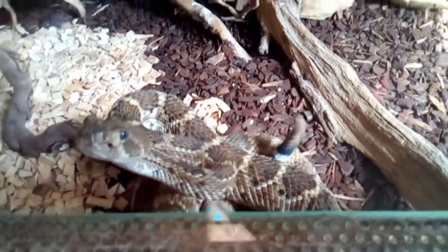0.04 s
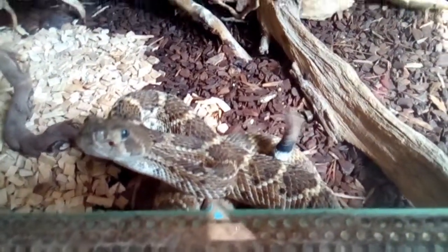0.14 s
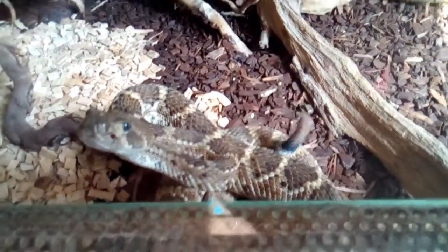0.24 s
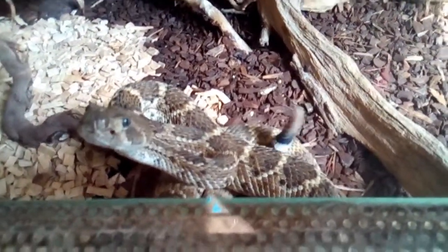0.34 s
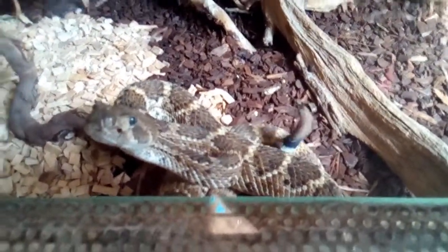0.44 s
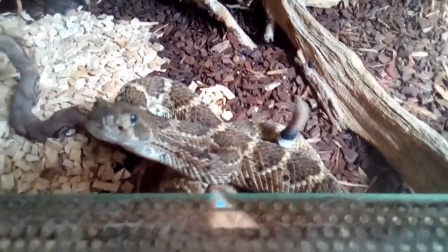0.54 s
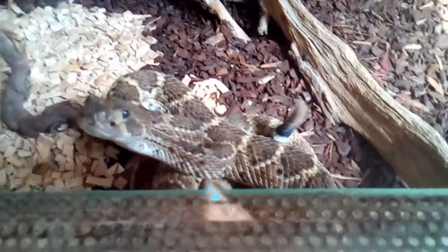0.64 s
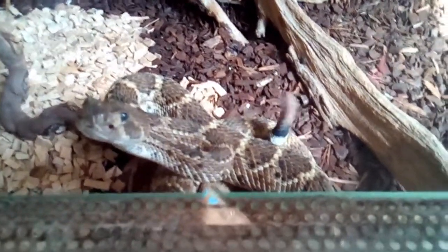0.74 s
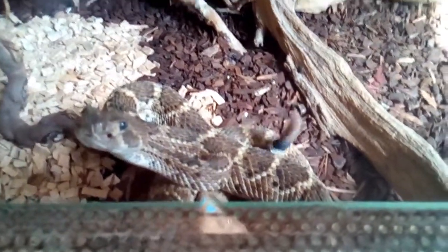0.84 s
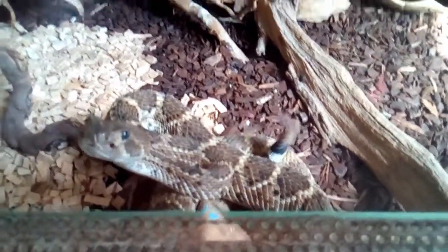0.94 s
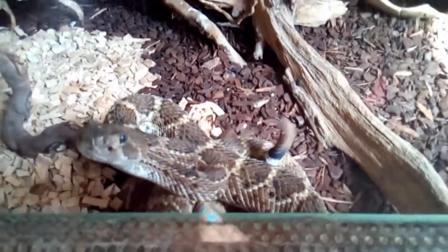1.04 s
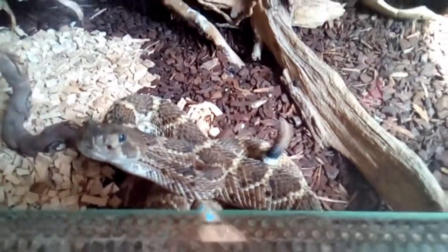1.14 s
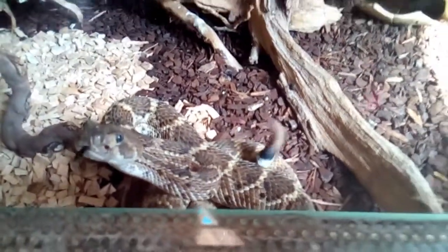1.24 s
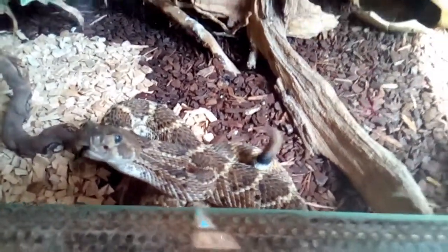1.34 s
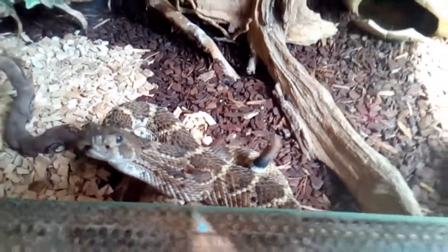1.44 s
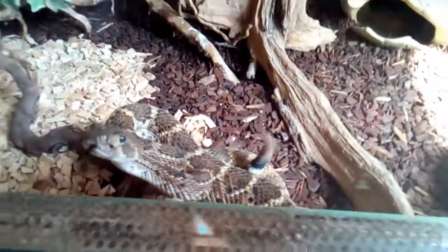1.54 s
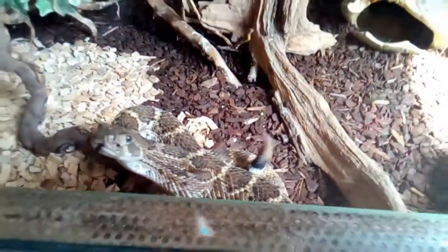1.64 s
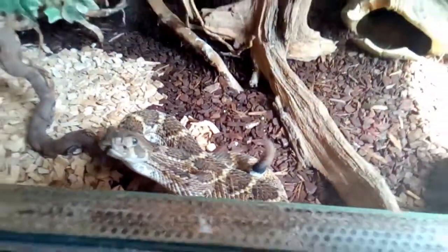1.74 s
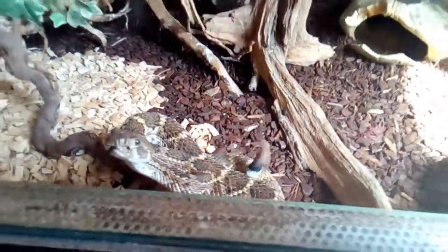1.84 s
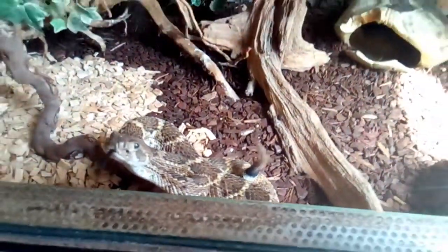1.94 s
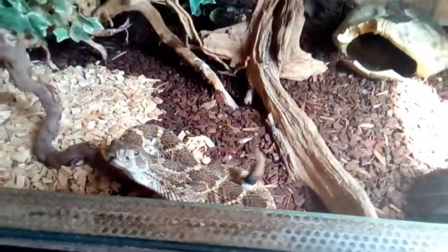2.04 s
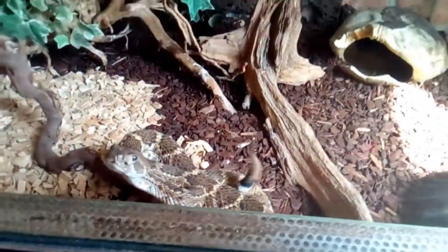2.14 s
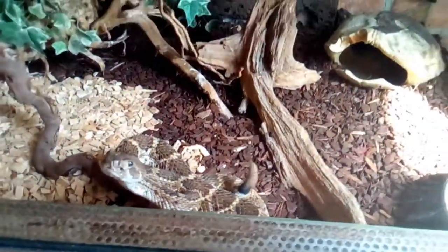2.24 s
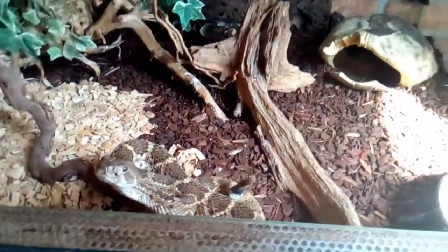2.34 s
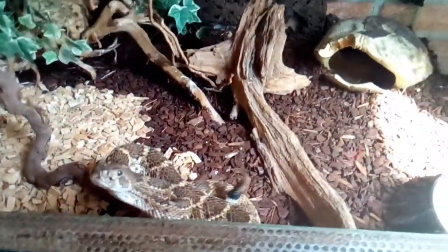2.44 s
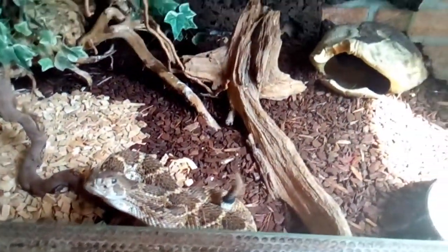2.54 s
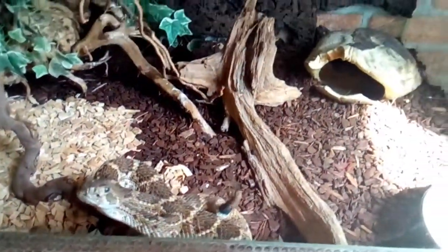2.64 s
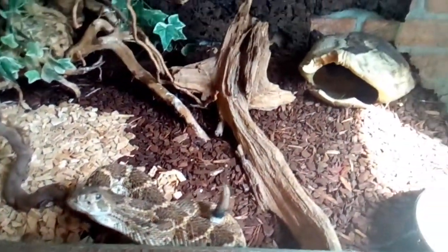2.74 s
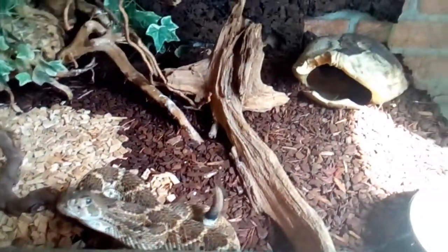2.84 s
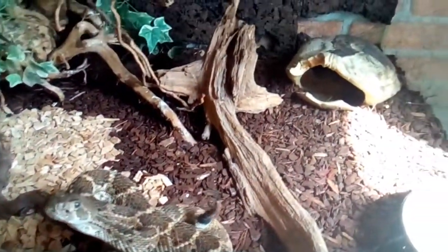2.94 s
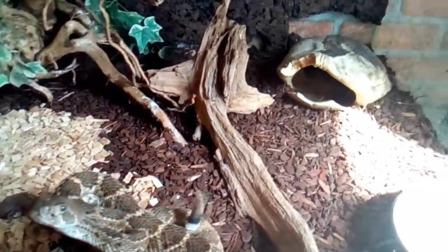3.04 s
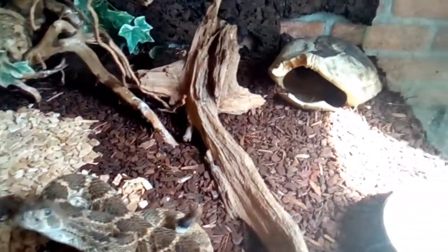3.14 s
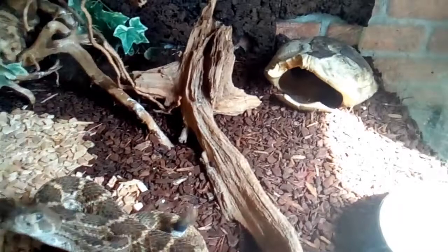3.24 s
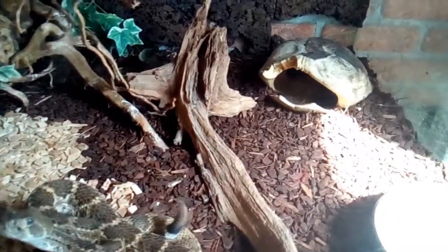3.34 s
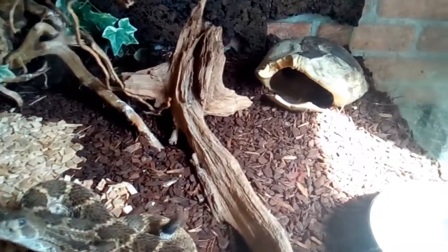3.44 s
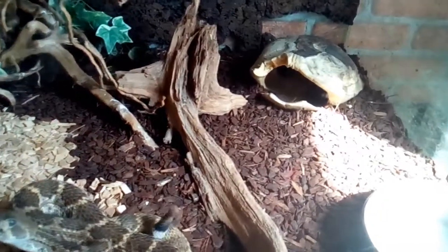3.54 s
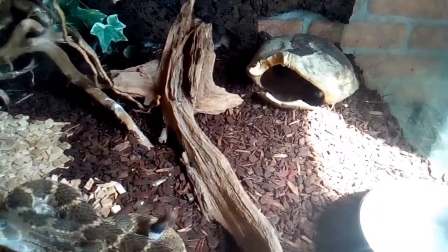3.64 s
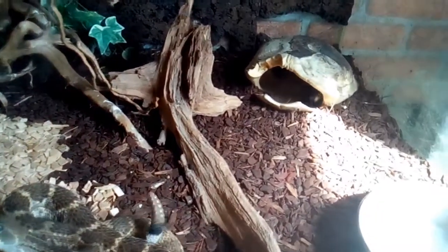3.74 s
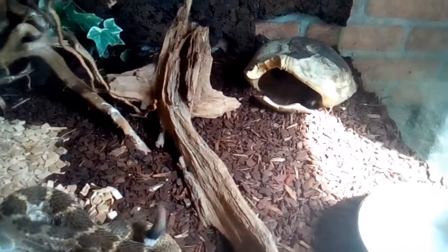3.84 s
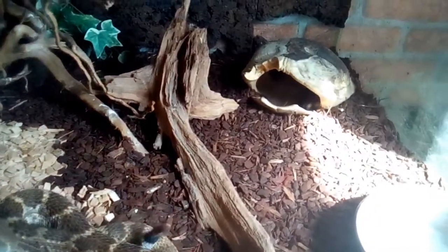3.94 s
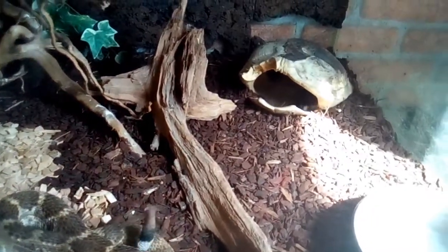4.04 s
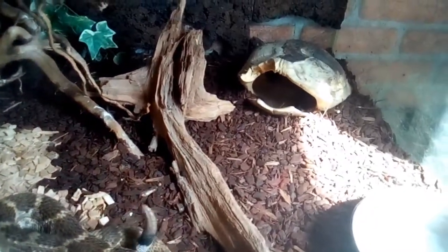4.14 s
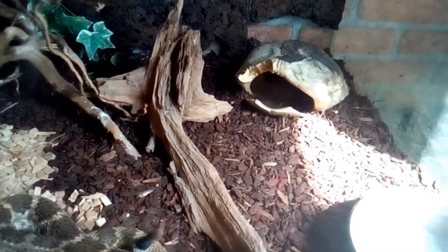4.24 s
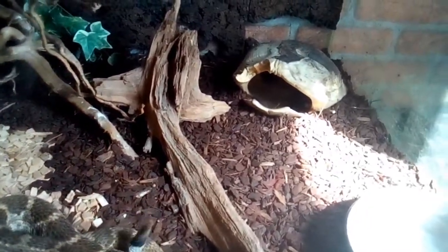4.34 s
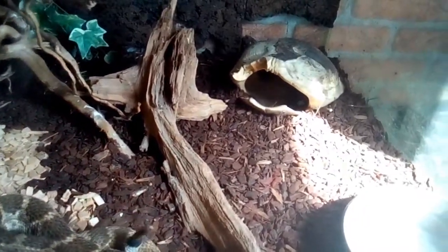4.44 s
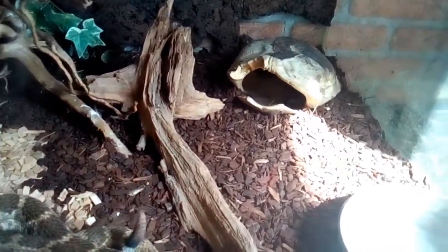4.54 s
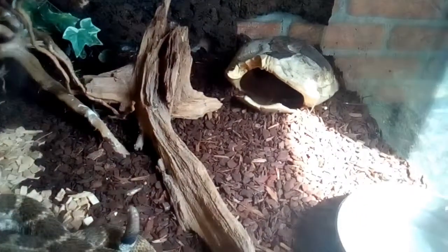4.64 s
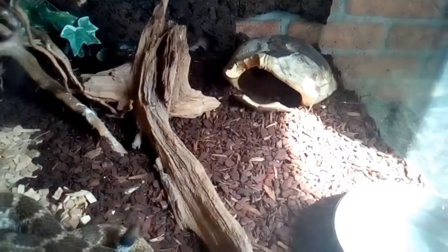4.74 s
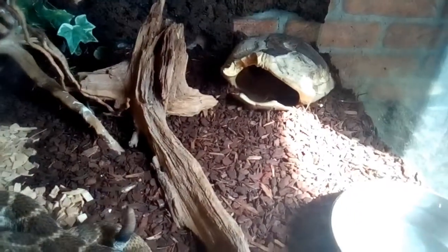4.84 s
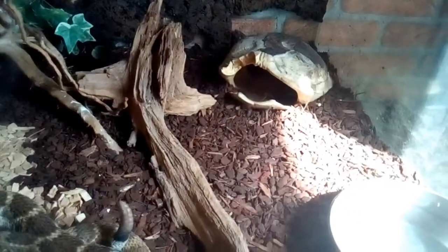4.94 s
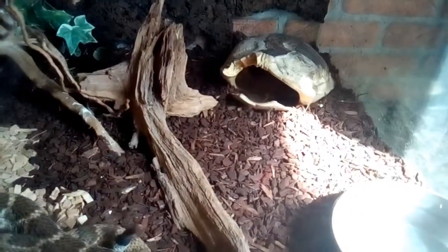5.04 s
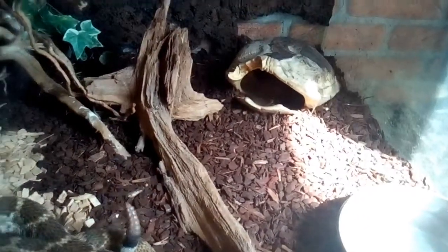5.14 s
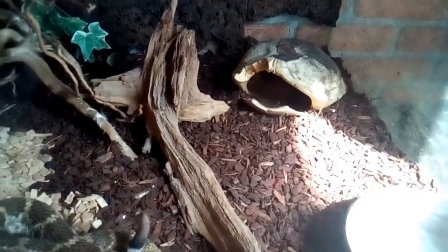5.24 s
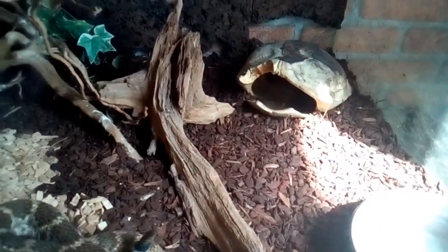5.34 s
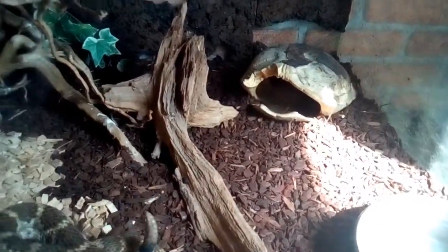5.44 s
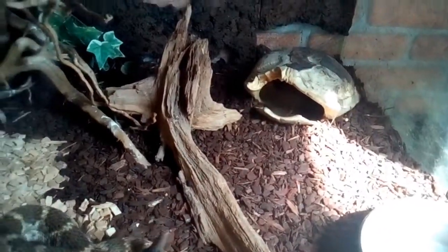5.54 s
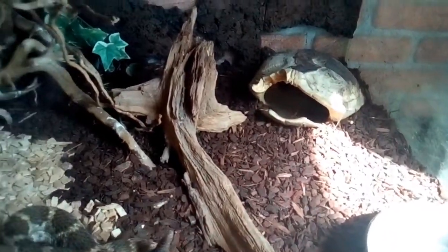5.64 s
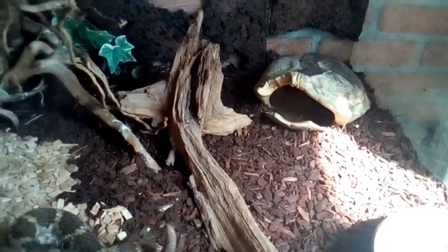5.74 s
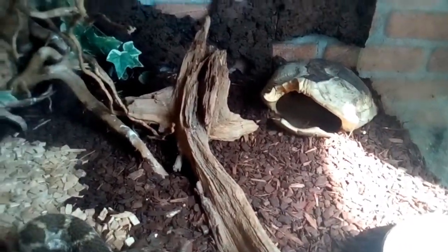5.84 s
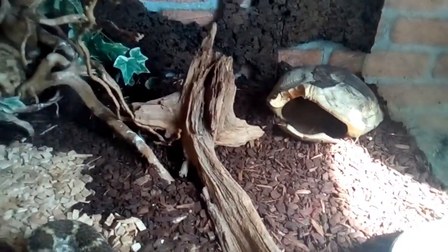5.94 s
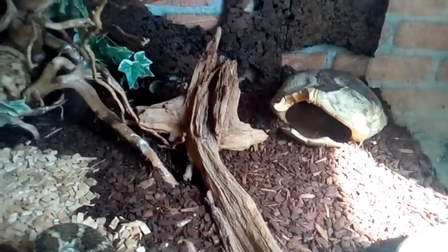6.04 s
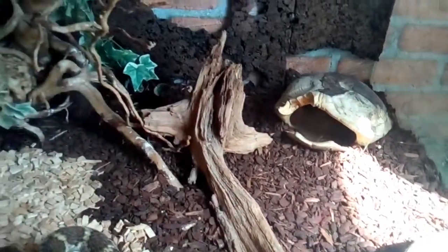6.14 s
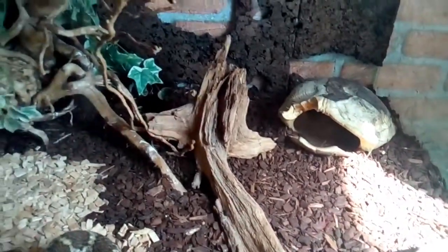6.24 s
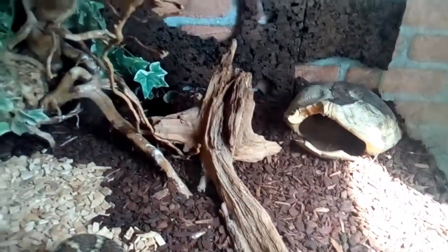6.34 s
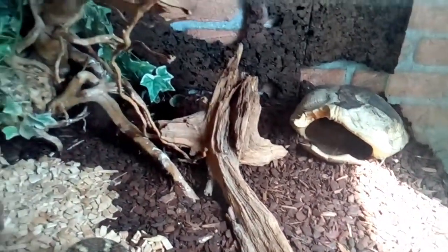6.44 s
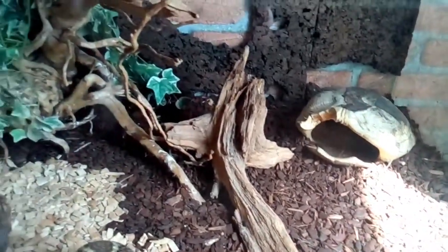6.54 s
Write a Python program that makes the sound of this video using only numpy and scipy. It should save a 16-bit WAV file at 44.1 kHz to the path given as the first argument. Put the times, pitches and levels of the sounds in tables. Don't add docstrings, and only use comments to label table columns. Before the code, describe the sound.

Dense dry rattling near a glass tank thins into rapid double clicks that gradually space out and weaken, with a few finger taps on the phone.

```python
import sys
import numpy as np
from scipy import signal
from scipy.fft import rfft, irfft, next_fast_len
from scipy.io import wavfile
from scipy.ndimage import map_coordinates

SR = 44100
rng = np.random.default_rng(int(sys.argv[2]) if len(sys.argv) > 2 else 0)


def linear_from_db(decibels):
    return 10 ** (np.asarray(decibels, float) / 20)


def wrap_up_sound(samples):
    columns = np.atleast_2d(samples).T
    tamed = np.clip(columns, -1, 1)
    steps = np.round(tamed * 32767).astype(np.int16)
    wavfile.write(sys.argv[1], SR, steps)


N = 291060
T = np.arange(N) / SR
TOP_HZ = 15525

# start_s, level_db
CHATTER = [
    (0.0, -28),
    (0.25, -30.5),
    (0.5, -29),
    (0.85, -30),
    (1.2, -30),
    (1.5, -30.5),
    (1.8, -31),
    (2.04, -33),
    (2.19, -32.5),
]
# centre_s, depth_db, half_length_s
LULLS = [
    (.281, -7, 0.0041),
    (.667, -6, .005),
    (.785, -0.5, 0.011),
    (.878, -4, .015),
    (1.07, -1.5, .018),
    (1.11, 1, 0.0035),
    (1.33, -1, .008),
    (2.187, -6, .006),
]
# from_s, to_s
CHATTER_FADE = (2.2, 2.65)
# start_s, level_db, return_after_s, return_rel_db (relative
SHAKES = [(2.2, -34, .012, -0.5), (2.243, -33.5, .022, -2), (2.295, -32, 0.025, -1.5),
          (2.346, -33, .015, 0), (2.387, -33, .014, -0.5), (2.444, -31.5, .025, .4),
          (2.505, -32.5, .016, -3), (2.546, -32.5, .022, -0.5), (2.62, -30.5, 0.021, -5),
          (2.673, -31, 0.026, -3.5), (2.738, -29, 0.025, -6.5), (2.794, -31, .019, -2),
          (2.84, -34.5, 0.016, -1), (2.899, -31.5, 0.024, -2.1), (2.943, -33, 0.019, -2),
          (2.995, -31.5, .017, -3), (3.049, -32, .016, -1), (3.105, -34.5, .014, 1.1),
          (3.157, -31, 0.013, -3.5), (3.213, -33, .018, -5), (3.258, -33, .02, 1.5),
          (3.323, -32, .017, -2), (3.383, -34, .022, -9), (3.426, -34, 0.013, 0.5),
          (3.489, -32, 0.021, -7), (3.536, -32, .014, -5.5), (3.588, -32.5, .014, -3.5),
          (3.647, -34.5, 0.018, -4.5), (3.697, -34, 0.013, 0),
          (3.758, -37.5, 0.017, -2), (3.806, -33, .022, -6.5), (3.876, -37.5, 0.018, -1),
               (3.929, -36, .013, 0), (3.997, -36, .024, -5), (4.053, -38, 0.011, 0.5),
               (4.123, -35.5, .024, -5.5), (4.189, -31.5, 0.021, -13), (4.244, -34, 0.024, -11),
               (4.301, -39.5, 0.013, 3.5), (4.383, -34.5, .014, -8), (4.438, -41.5, 0.02, 2),
               (4.491, -37, .013, 3), (4.57, -36, 0.018, -0.5), (4.652, -35, .021, -7.5),
               (4.738, -37.5, 0.022, -6), (4.826, -35.5, 0.017, -9), (4.924, -45.5, 0.014, -13),
               (4.978, -38.5, 0.023, -3), (5.095, -36, .027, -9.5), (5.206, -40.5, .023, -2.2),
               (5.345, -42, .026, -3.5), (5.483, -36.5, .018, -4), (5.633, -43.5, .018, 2),
               (5.78, -43, .02, -0.5), (5.93, -47, .015, -1), (6.072, -35, 0.023, -6),
               (6.296, -39, .026, -7.5), (6.507, -52, 0.016, 6)]
# pitch_hz, width_hz, level_db
SEGMENTS = [(3180, 27, -4), (3428, 80, -2), (3800, 130, -8.5), (3870, 35, -4), (4365, 190, 1.5),
            (4344, 40, -16), (4630, 57, 4.5), (4770, 150, -3), (4930, 53, -3), (5123, 95, 6),
            (5430, 100, 3), (5613, 113, 6), (6163, 112, 11), (6260, 84, -1), (6454, 107, 7.5),
            (6400, 63, -18.5)]
# pitch_hz, width_hz, level_db
SHEEN = [(9270, 300, -3), (10200, 930, -5)]
# start_s, large_segments_db, small_segments_db, snap_db
FACING = [(0.0, -3, -2, 1), (0.25, -1, -1, -2.5), (0.8, -0.5, -4, 0), (1.2, -4, -5, -0.5),
          (1.8, -3, -0.7, -0.5), (2.2, -8.5, -3, -0.3), (2.7, 1.3, -5, -5), (3.3, 4.5, -1.3, -2.5),
          (4.5, 8, 2, -3.5), (5.2, 6.5, 2.5, -1.2), (6.1, 5, -3, -4), (6.6, 6, 1.5, -1)]
# pitch_hz, level_db (per Hz)
MIC_COLOUR = [(700, -64), (1300, -26.5), (2000, -16.5), (2500, -15), (3000, -7), (3500, -3), (4800, 1.5),
              (6300, -8.5), (7000, -11), (7900, -20), (9500, -28.5), (11500, -33), (13600, -32),
              (14700, -24.5)]
# pitch_hz, t60_s
TANK_DECAY = [(2500, 0.16), (4700, .15), (9000, 0.083)]
# pitch_hz, t60_s
ROOM_DECAY = [(2500, 0.95), (4700, 0.74), (9000, 0.35)]
# pitch_hz, width_hz
WALL_BAND = (4550, 8200)
# start_s, peak_db, pitch_hz, snap_db (bright part)
TICKS = [
    (0.342, -44.5, 400, -60),
    (.347, -56, 110, -70),
    (.892, -50, 220, -70),
    (1.0363, -38, 405, -50),
    (1.168, -39, 474, -50),
    (2.4056, -29.5, 544, -2.5),
]
# pitch_hz, level_db (per Hz)
AIR_COLOUR = [(15, -40), (25, -16.5), (131, -9), (177, -7), (267, -4.5), (374, -3.5), (493, -7.5),
              (650, -3.5), (1000, -8), (1550, -13.5), (2500, -14.5), (4800, -22), (6600, -20.5),
              (7600, -31.5)]
# pitch_hz, level_db (per Hz)
HISS_COLOUR = [(3000, -47), (7000, -7), (9500, -17.5), (13600, -16), (14200, -2), (14700, -8.5), (15400, 3)]
# pitch_hz, width_hz, level_db
BOOM_MODES = [(219, 49, -4), (270, 26, -4.5)]
# centre_s, gain_db, half_length_s
BOOM_SWELLS = [(0, 18, 0.066), (.4, 5, .12), (.82, 8.5, 0.12), (1.36, 6, .05), (1.6, 12, 0.11),
               (1.78, 10, .06), (2.2, 2, .1), (2.98, 5.5, 0.088), (3.25, 14.5, 0.096), (3.38, 7.5, .05),
               (5.39, 7, 0.074), (6.27, 7, .1)]
# centre_s, gain_db, half_length_s
HAND_SHIFTS = [(0, 21, 0.065), (.3, 22, .1), (.68, 14, .06), (1.82, 18, 0.061), (2.2, 14, .07),
               (2.45, 11.5, 0.14), (4.0, 7, .1), (4.35, 7, .15), (4.93, 8, .1), (5.45, 6, .15),
               (5.8, 6, .15), (6.45, 8, .2)]

OUT_BRIGHT_DB, BACK_BRIGHT_DB, BRIGHT_SCATTER_DB = -1.7, 0.5, 3.5
LEAD_S, LEAD_DB, LEAD_GROWS = .011, -52.5, 1
SETTLE_S, SETTLE_DB, SETTLE_SPAN_S = .016, (-4, -18.5), (2.7, 5.7)
FLUTTER_DB, FLUTTER_HZ = 0.52, 18
AIR_DB, AIR_DRIFT_DB = -66.5, 0.45
DRONE_DB, DRONE_FADE_S = (-57.5, -71), (0.99, 2.2)
BOOM_DB, BOOM_DRIFT_DB = -67, 2.5
RUMBLE_DB, RUMBLE_DRIFT_DB = -80.5, 3.5


def rattle():
    times, size, bright = clicks(count=36, spread_s=.0047, scatter_db=3.0, chatter_count=8000)
    at = np.clip(np.round(times * SR).astype(int), 0, N - 1)
    size = size * rng.choice([-1, 1], len(at))
    share = linear_from_db(7.3 * rng.standard_normal((len(at), len(SEGMENTS))))
    share *= rng.choice([-1, 1], share.shape) / np.linalg.norm(share, axis=1, keepdims=True)
    large_db, small_db, snap_db = curves(FACING)
    large_db, small_db = large_db[at], small_db[at]
    m = next_fast_len(N + 8192)
    f = np.fft.rfftfreq(m, 1 / SR)

    snaps = linear_from_db(1.2 * snap_db) * np.bincount(at, size, N)
    spectrum = 0.24 * rfft(snaps, m)
    for hz, width_hz, db in SHEEN:
        drifting = snaps * linear_from_db(1.4 * wobble(2.25))
        spectrum += 0.2 * linear_from_db(db) * rfft(drifting, m) * mode(f, hz, width_hz)

    for k, (hz, width_hz, db) in enumerate(SEGMENTS):
        large_part = np.exp(-((hz - 3200) / 700) ** 2)
        small_part = np.exp(-((hz - 6300) / 500) ** 2)
        facing_db = large_db * large_part + small_db * small_part
        facing_db -= 0.13 * large_db + 0.052 * small_db
        turning = linear_from_db(1.3 * facing_db + 0.73 * wobble(2.625, times))
        lean = linear_from_db(0.75 * bright * np.log2(hz / 4500))
        blows = np.bincount(at, size * lean * turning * share[:, k], N)
        clack = 0.59 * mode(f, hz, 900)
        ring = 2.144 * linear_from_db(db) * mode(f, hz, width_hz)
        spectrum += rfft(blows, m) * (clack + ring)
    return linear_from_db(22) * irfft(spectrum * rfft(causal(MIC_COLOUR), m), m)[:N]


def clicks(count, spread_s, scatter_db, chatter_count):
    s, db, bright = strokes()
    place = 6 * (np.arange(count) + rng.random((len(s), count))) / count - 2.9
    swing = np.exp(-(place / np.where(place < 0, 1.2, 1.8)) ** 2)
    size = linear_from_db(scatter_db * rng.standard_normal((len(s), count))) * swing
    size *= (linear_from_db(db) / np.sqrt(np.mean(size ** 2, axis=1)))[:, None]
    stroke_times = s[:, None] + .0005 + spread_s * place

    fade_start, fade_end = CHATTER_FADE
    loose = rng.uniform(0, fade_end, chatter_count)
    loose_db = np.interp(loose, *np.transpose(CHATTER)) - 3.5 + 4 * rng.standard_normal(chatter_count)
    loose_db += bumps(LULLS, loose) + FLUTTER_DB * wobble(FLUTTER_HZ, loose)
    loose_db += np.interp(loose, [fade_start - .03, fade_start, fade_end], [0, -6, -15])

    times = np.r_[stroke_times.ravel(), loose]
    sizes = np.r_[size.ravel(), linear_from_db(loose_db)]
    return times, sizes, np.r_[np.repeat(bright, count), 0 * loose]


def strokes():
    s, db, back_s, back_db = np.transpose(SHAKES)
    times = np.c_[s - LEAD_S, s, s + back_s, s + back_s + SETTLE_S]
    lead_db = LEAD_DB + LEAD_GROWS * (db + 40)
    settle_db = db + np.minimum(back_db, 0) + np.interp(s, SETTLE_SPAN_S, SETTLE_DB)
    level = np.c_[lead_db, db, db + back_db, settle_db]
    bright = np.array([OUT_BRIGHT_DB, OUT_BRIGHT_DB, BACK_BRIGHT_DB, BACK_BRIGHT_DB])
    bright = bright + BRIGHT_SCATTER_DB * rng.standard_normal(times.shape)
    return times.ravel(), level.ravel(), bright.ravel()


def echoes(x, decay, sparse_db, size, hop=11000):
    out = np.zeros(N + 2 * hop + 2 * size)
    for start in range(-hop, N, hop):
        walls = rng.standard_normal(size) * linear_from_db(sparse_db * rng.standard_normal(size))
        hz, t, z = signal.stft(walls, SR, nperseg=256)
        dying = linear_from_db(-60 * t / along(decay, hz)[:, None])
        tail = signal.istft(z * dying, SR, nperseg=256)[1]
        n = np.arange(max(start, 0), min(start + 2 * hop, N))
        crossfade = np.sin(np.pi * (n - start) / (2 * hop))
        piece = signal.fftconvolve(x[n] * crossfade, tail / np.linalg.norm(tail))
        out[n[0] + 100:][:len(piece)] += piece
    return out[:N]


def fingers():
    out, t = np.zeros(N + SR), np.arange(-400, 600) / SR
    late = np.maximum(t + .0011, 0)
    for s, db, hz, snap_db in TICKS:
        knock = -linear_from_db(db) * np.cos(2 * np.pi * hz * t) * np.exp(-(t * hz / 0.47) ** 2)
        ring = linear_from_db(snap_db + 19.5 - 60 * late / 0.0017) * np.sin(2 * np.pi * 4700 * late)
        ring *= (1 - np.exp(-late / 0.00057)) ** 2
        edge = linear_from_db(snap_db - 29.5) * np.cos(2 * np.pi * 8500 * t)
        edge *= np.exp(-((t + .0007) / 0.00021) ** 2)
        out[round(s * SR) - 400:][:len(t)] += knock + ring + edge
    return out[:N]


def handling_rumble():
    db = RUMBLE_DB + bumps(HAND_SHIFTS, T) + RUMBLE_DRIFT_DB * wobble(5) - 5.0
    return linear_from_db(db) * noise(lambda f: mode(f, 77, 70) ** 2)


def low_boom():
    db = BOOM_DB + bumps(BOOM_SWELLS, T) + BOOM_DRIFT_DB * wobble(6) - 4.0
    return linear_from_db(db) * noise(lambda f: sum(linear_from_db(g) * mode(f, hz, w) ** 2 for hz, w, g in BOOM_MODES))


def room_air():
    air_db = AIR_DB + AIR_DRIFT_DB * wobble(2.62)
    drone_db = np.interp(T, DRONE_FADE_S, DRONE_DB)
    air = linear_from_db(air_db + 5) * noise(lambda f: linear_from_db(along(AIR_COLOUR, f)))
    return air + linear_from_db(drone_db - 5) * noise(lambda f: mode(f, 975, 490) ** 2)


def microphone_hiss():
    return linear_from_db(-73.0) * noise(lambda f: linear_from_db(along(HISS_COLOUR, f)) * (f < TOP_HZ))


def unit(x):
    return x / np.sqrt(np.mean(x ** 2) + 1e-20)


def along(points, hz):
    f, v = np.transpose(points)
    return np.interp(np.log(hz + 1), np.log(f + 1), v)


def curves(rows):
    s, *cols = np.transpose(rows)
    return [np.interp(T, s, c) for c in cols]


def bumps(rows, t):
    return sum(db * np.exp(-((t - s) / half) ** 2) for s, db, half in rows)


def wobble(rate, t=T):
    return map_coordinates(rng.standard_normal(int(N * rate / SR) + 4), [t * rate])


def filtered(x, response):
    m = next_fast_len(N + SR // 2)
    return irfft(rfft(x, m) * response(np.fft.rfftfreq(m, 1 / SR)), m)[..., :N]


def mode(f, hz, width_hz):
    return 1j * f * width_hz / (hz * hz - f * f + 1j * f * width_hz)


def causal(points, size=2048):
    cep = irfft(np.log(linear_from_db(along(points, np.fft.rfftfreq(size, 1 / SR))) + 1e-6))
    cep[1:size // 2] *= 2
    cep[size // 2 + 1:] = 0
    return irfft(np.exp(rfft(cep)))


def noise(response):
    return unit(filtered(rng.standard_normal(N), response))


def scene():
    tail = rattle()
    tank = linear_from_db(-6.5) * echoes(tail, TANK_DECAY, sparse_db=13, size=9000)
    far = filtered(tail, lambda f: mode(f, *WALL_BAND))
    room = linear_from_db(-9.5) * echoes(far, ROOM_DECAY, sparse_db=0.0, size=30000)
    hand = fingers() + handling_rumble()
    background = low_boom() + room_air() + microphone_hiss()
    return (tail + tank + room + hand + background)[None]


def low_pass(x):
    return signal.sosfilt(signal.butter(12, 15525, fs=SR, output="sos"), x)


def record(dry):
    mix = filtered(dry, lambda hz: hz < TOP_HZ)
    return low_pass(mix)


dry = scene()
out = record(dry)
wrap_up_sound(out)
```